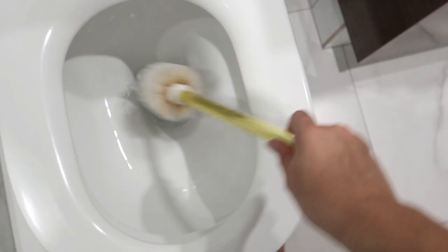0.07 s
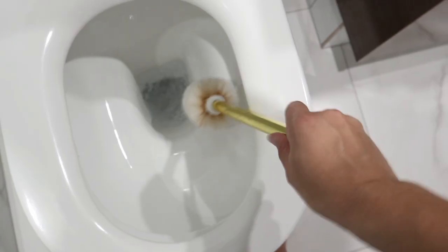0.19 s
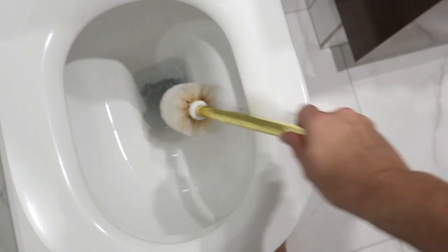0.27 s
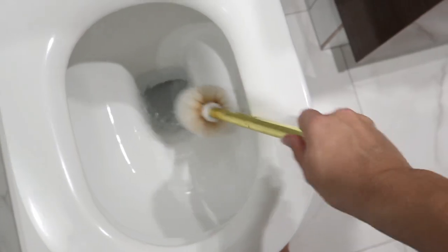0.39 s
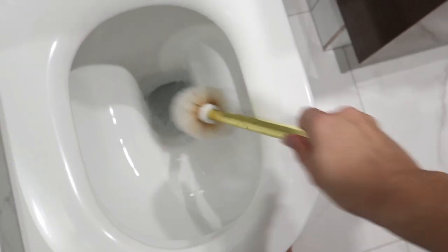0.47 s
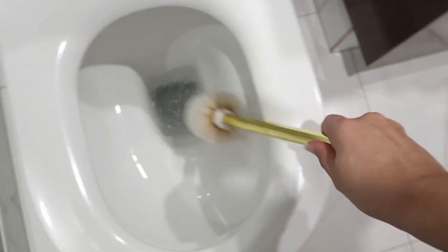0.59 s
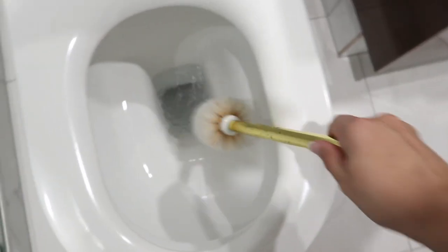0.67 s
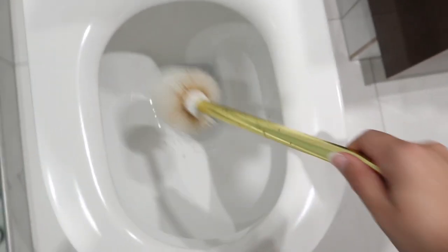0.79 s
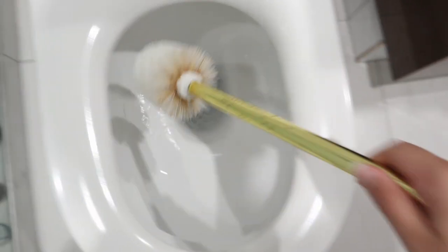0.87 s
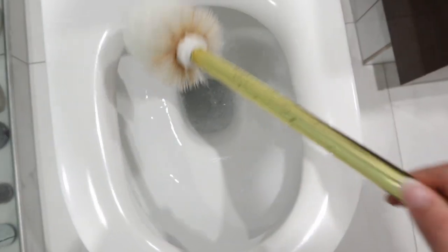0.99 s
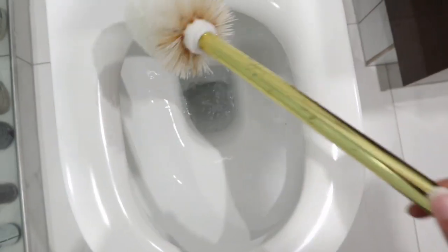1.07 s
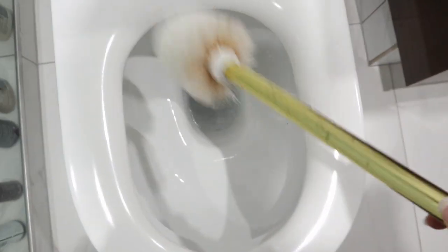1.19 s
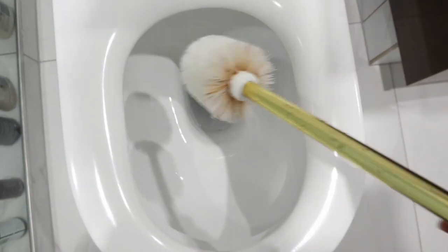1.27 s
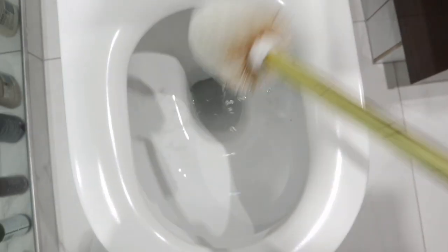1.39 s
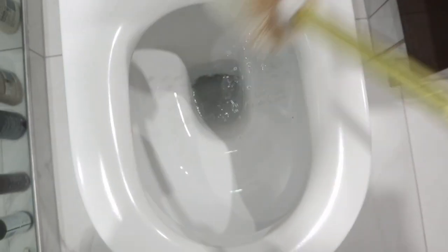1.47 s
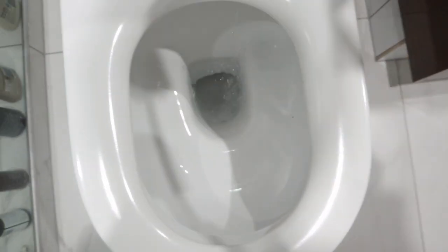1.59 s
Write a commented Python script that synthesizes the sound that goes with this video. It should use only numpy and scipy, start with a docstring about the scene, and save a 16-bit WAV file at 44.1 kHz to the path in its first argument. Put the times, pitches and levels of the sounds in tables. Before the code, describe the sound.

A plastic toilet brush knocks the porcelain bowl three times, each softer, with short wet trickles and ticking drops afterwards. Small echoing tiled bathroom, close handheld microphone, low mains hum and airy ventilation behind.

```python
"""In a tiled bathroom, a plastic brush is knocked three times on the porcelain of a toilet bowl; drops fall from it.
Each knock is a set of dying tones with a crack of noise; drops and trickles are short bursts of filtered noise.
Behind them lie mains hum, made of sine waves, and the rush of ventilation, made of patchy noise.
The recorder's gain control turns everything down after loud sounds, then slowly up again."""
import sys
import numpy as np
from scipy import signal
from scipy.fft import rfft, irfft
from scipy.io import wavfile
from scipy.ndimage import uniform_filter1d

SR = 44100
rng = np.random.default_rng(int(sys.argv[2]) if len(sys.argv) > 2 else 0)


def elevation(decibels):
    """Turn decibel levels (scalar or array-like) into linear amplitude ratios."""
    levels = np.asarray(decibels, float)
    return 10 ** (levels / 20)


def master(y):
    """Save y as 16-bit WAV."""
    cut = np.clip(np.atleast_2d(y).T, -1, 1)
    pcm = np.round(cut * 32767)  # scale
    wavfile.write(sys.argv[1], SR, pcm.astype(np.int16))


N = 72765  # length of the scene in samples
LAG_S = -0.000085  # negative: the right side hears noise and trickles this much later


def read(points, hz):
    """Reads a spectrum between its points, along a logarithmic frequency axis."""
    f, value = np.transpose(points)
    return np.interp(np.log(hz + 1), np.log(f + 1), value)


def curve(points, t):
    """Reads a curve in time between its points."""
    return np.interp(t, *np.transpose(points))


def evened(x):
    """Scales a sound to an rms of 1."""
    return x / np.sqrt(np.mean(x ** 2) + 1e-20)


def add(mix, start_s, sound):
    """Adds a sound to the mix from start_s on, cut off at the end of the mix."""
    part = mix[:, round(start_s * SR):][:, :sound.shape[-1]]
    part += sound[..., :part.shape[1]]


def ports(x, lag_s):
    """Makes a left-right pair: a negative lag lets the sound reach the right side later."""
    hz = np.fft.rfftfreq(len(x), 1 / SR)
    right = irfft(rfft(x) * np.exp(2j * np.pi * hz * lag_s), len(x))
    return np.array([x, right])


def spread(a, b, hz):
    """Blends two spectra into a left-right pair: the more they share, the narrower it sounds."""
    # how alike left and right are, before the later steps: f/Hz, likeness (0 to 1)
    likeness = [(25, 0.93), (60, 1), (400, 1), (1000, 0.95), (2500, 0.78), (6000, 0.68), (15000, 0.34)]
    # balance: f/Hz, left minus right level/dB
    balance = [(30, -7.5), (180, -2.5), (550, -1.5), (1650, -1.5), (4970, -1), (15000, -0.5)]
    # level of what both sides share, so treble comes mostly from the sides: f/Hz, level/dB
    centre = [(6000, 0), (6500, -1), (6900, -27), (9500, -27), (12500, -13), (15000, -18)]
    same = np.clip(read(likeness, hz), 0, 1)[:, None]
    side = elevation(read(balance, hz) / 2)[:, None]
    left = a * side * np.exp(-2j * np.pi * hz * LAG_S)[:, None]
    right = (same * a + np.sqrt(1 - same ** 2) * b) / side
    mid = (left + right) / 2 * elevation(read(centre, hz))[:, None]
    off = (left - right) / 2
    return np.array([mid + off, mid - off])


def hum():
    """Mains hum: sine waves at twice the mains frequency and its multiples, wavering together."""
    # the lines of the hum: f/Hz, rms level before the wavering/dB
    lines = [(100, -37), (200, -55), (300, -49)]
    # how the hum wavers: t/s, level change/dB
    waver = [(0, 5), (.12, 5.5), (.33, 2), (.4, -1), (.6, 2), (.8, 0), (.97, -6.5), (1.2, -2.5),
             (1.58, 3.5), (1.65, 3.5)]
    t = np.arange(N) / SR
    total = np.zeros(N)
    for hz, db in lines:
        total += np.sqrt(2) * elevation(db) * np.sin(2 * np.pi * (hz * t + rng.random()))
    return elevation(curve(waver, t)) * total


def ventilation():
    """Rushing air: random noise, patchy in time and pitch, strengthened where the ducts resonate."""
    # tone colour of the rush without the ducts: f/Hz, relative level per Hz/dB
    air_spectrum = [(15, -61), (25, -20.5), (97, -5.5), (149, -13.5), (301, -11), (560, -15.5),
                    (775, -17.5), (1130, -23), (1400, -22), (2220, -26), (5730, -30.5), (12500, -41.5),
                    (16000, -65)]
    # duct resonances: f/Hz, width/Hz, boost/dB
    ducts = [(217.7, 12, 9), (378.4, 13, 8.5), (486.6, 28.8, 13), (786.3, 30.3, 16.5), (860, 17, 10),
             (995, 112, 11), (1400, 120, 8.5), (1922, 35, 10)]
    # how the rush changes: t/s, level change/dB
    rush = [(0, 3), (.1, 3), (.3, 5.5), (.6, -4), (.85, -3.5), (.98, -6), (1.2, -5.5), (1.45, -3),
            (1.65, -1)]
    air_db, patchy_db = -33, 1.4  # rms level before the changes; rms depth of the patches
    frames, hz = N // 512 + 5, np.fft.rfftfreq(2048, 1 / SR)
    a, b, c, d, patches = rng.standard_normal((frames, 1025, 5)).T
    patches = uniform_filter1d(patches, size=16, axis=0)  # smooth across pitch
    patches = evened(uniform_filter1d(patches, size=5, axis=1))  # smooth in time
    db = read(air_spectrum, hz)
    for f, width_hz, boost_db in ducts:
        db = db + boost_db / (1 + (2 * (hz - f) / width_hz) ** 2)
    z = spread(a + 1j * b, c + 1j * d, hz) * elevation(db[:, None] + patchy_db * patches)
    noise = signal.istft(z, nperseg=2048, noverlap=1536)[1][:, :N]
    return elevation(air_db + curve(rush, np.arange(N) / SR)) * evened(noise)


def bathroom(x):
    """Reverberation: dense echoes of random sign, each pitch band dying at its own speed."""
    # how long the room rings: f/Hz, time to fall by 60 dB/s
    room_t60 = [(150, 0.96), (400, 0.57), (1000, 0.54), (2500, 0.55), (5000, 0.5), (9000, 0.15),
                (16000, 0.044)]
    taps = np.zeros((2, SR))
    # one echo at a random place in every 20 samples
    at = np.arange(200, SR - 20, 20) + rng.integers(0, 20, (2, (SR - 201) // 20))
    np.put_along_axis(taps, at, rng.choice([-1., 1.], at.shape), 1)
    hz, t, z = signal.stft(taps, SR, nperseg=512)
    fading = elevation(-60 * t / read(room_t60, hz)[:, None])
    tail = signal.istft(spread(*z, hz) * fading, SR, nperseg=512)[1]
    return signal.fftconvolve(x[None], tail / np.linalg.norm(tail[0]), axes=1)[:, :N]


def trickle(length_s, db, hz, width_hz):
    """Water running off the bristles: uneven fine noise in one band that fades a little and stops short."""
    fade_db, edge_s = -9, 0.0013  # fade over the whole length; time to start and to stop
    n = round(length_s * SR)
    t, f = np.arange(n) / SR, np.fft.rfftfreq(n, 1 / SR)
    bursts = elevation(2.3 * rng.exponential(1, (2, 8192))[:, :n])  # some grains stick out
    spatter = rng.standard_normal((2, 8192))[:, :n] * bursts
    a, b = irfft(rfft(spatter) / (1 + (2 * (f - hz) / width_hz) ** 6), n)
    pair = evened(ports(a, LAG_S) + 0.4 * np.array([b, -b]))  # b widens the pair
    edges = np.clip(np.minimum(t, length_s - t) / edge_s, 0, 1)
    return elevation(db + fade_db * t / length_s) * pair * edges


def water_drop(db, low_hz, high_hz, t60):
    """A falling drop: a tick made of a sudden push and noise, dying together, in a steep band."""
    lag_s = -0.0000688  # the right side hears it later
    t = np.arange(2048) / SR
    splash = (1 + rng.standard_normal(len(t))) * elevation(-60 * t / t60)
    band = signal.butter(7, [low_hz, high_hz], "bandpass", fs=SR, output="sos")
    tick = signal.sosfilt(band, splash)
    return ports(elevation(db) * tick / abs(tick).max(), lag_s)


def knock(db, bright_db, thud_db, air_db, contact_s):
    """Brush on porcelain: paired tones (modes) swell and die under a crack of noise. Row 3 feeds the room."""
    # pitches of the modes of the bowl and its air: f/Hz
    mode_hz = [147, 219, 310, 425, 465, 610, 746, 1196, 1378, 1472, 1578, 1706, 1952, 2204, 2290, 2412,
               2735, 3000, 3200, 3420, 3865, 4253, 4650, 5000, 5460, 6050, 6600]
    # the same modes in order: level before each knock's changes/dB, time to fall by 60 dB/s
    modes = [(-18, 0.21), (-12.5, 0.25), (-14, 0.044), (-4.5, 0.032), (-23.5, 0.22), (-12, 0.049),
             (-10, 0.036), (-19, 0.055), (-9, 0.05), (-0.5, 0.026), (-1, 0.029), (-4.5, 0.032), (-18, 0.13),
             (-10, 0.019), (-5, 0.025), (-9, 0.032), (-11, 0.036), (-19, .04), (-23, 0.036), (-18, 0.034),
             (-3.5, 0.02), (-16, 0.035), (-25.5, 0.017), (-16.5, 0.02), (-16, 0.03), (-16, 0.019),
             (-24, 0.03)]
    # tone colour of the crack before each knock's brightness: f/Hz, relative level per Hz/dB
    crack_spectrum = [(150, -34), (400, -12), (900, 0.5), (1500, -2.5), (2400, -2), (3200, -8.5),
                      (3900, 0.5), (4600, -12.5), (5500, -7), (6500, -9), (8000, -11), (12000, -26.5),
                      (17000, -76)]
    crack_db, crack_t60, crack_near_db = -8, 0.036, -3.5  # the crack is weaker straight than in the room
    lag_s = -0.000057  # the right side hears it later
    twin_db, twin_apart = -5, 0.042  # twin of each mode: highest level, typical share of pitch away
    scatter = 1  # random phase of a blow, radians
    swell_s = 0.044  # air in the bowl, under 250 Hz: it swells this long, fades and returns faintly
    bloom_cycles, treble_s = 2.18, 0.0026  # other modes swell this many cycles; over 3 kHz this much longer
    air_to_room_db, bass_to_room_db, ring_to_room_db = -5, -2, -8.5  # under 250 Hz, under 1 kHz, above
    wall_s, wall_db = 0.0095, -22  # first echo off the tiles

    t = np.arange(16384) / SR
    out = np.zeros((3, len(t)))
    for hz, (mode_db, t60), u in zip(mode_hz, modes, rng.standard_normal((len(modes), 4))):
        in_air = hz < 250
        # phase at left and right, pushed apart at random
        apart = 0.5 * u[1] * np.array([[1], [-1]]) * min(hz / 1500, 1)
        turn = 2 * np.pi * hz * (t - contact_s + np.array([[0], [lag_s]])) + apart
        twin = elevation(twin_db) * min(hz / 3000, 1) * np.sin(turn * (1 + twin_apart * u[2]) + np.pi * u[3])
        if in_air:
            level_db = mode_db + air_db
            progress = t / swell_s
            to_room_db = air_to_room_db
        else:
            level_db = mode_db + thud_db * (hz < 500) + bright_db * np.log2(hz / 1500)
            bloom_s = contact_s + bloom_cycles / hz + treble_s * (hz > 3000)
            progress = np.minimum(t / bloom_s, 1)
            to_room_db = bass_to_room_db if hz < 1000 else ring_to_room_db
        bloom = np.sin(np.pi / 2 * progress)
        mode = bloom * elevation(level_db - 60 * t / t60) * (np.cos(turn + scatter * u[0]) + twin)
        out += np.vstack([mode, elevation(to_room_db) * mode[1]])

    f = np.fft.rfftfreq(len(t), 1 / SR)
    colour = elevation(read(crack_spectrum, f) + bright_db * np.log2((f + 50) / 1500))
    a, b = irfft(rfft(rng.standard_normal((2, len(t)))) * colour)
    crack = evened(ports(a, lag_s) + 0.067 * np.array([b, -b]))  # b widens the pair
    crack = crack * elevation(crack_db - 60 * t / crack_t60) * np.minimum(t / contact_s, 1)
    out += np.vstack([elevation(crack_near_db) * crack, crack[1]])
    echo = np.roll(out, round(wall_s * SR), axis=1) * (t > wall_s)
    return elevation(db) * (out + elevation(wall_db) * echo)


def scene():
    """Hum and ventilation under trickles, drops and knocks, which also sound in the room."""
    # water running off the bristles: start t/s, length t/s, rms level at the start/dB, centre f/Hz, width/Hz
    trickles = [(0.93, 0.049, -53, 3100, 2200), (0.71, .007, -47, 4500, 3500),
                (.869, 0.076, -36.5, 3240, 1800), (.585, 0.055, -37.5, 2500, 5600)]
    # drops: t/s, peak level/dB, low edge f/Hz, high edge f/Hz, time for the splash to fall by 60 dB/s
    drops = [(0.8037, -15, 3550, 7200, 0.015), (.8046, -25, 2000, 4300, 0.0092),
             (0.8667, -14.5, 2400, 4260, .002)]
    # knocks: t/s, strength level/dB, brightness/dB per octave, extra thud at 250-500 Hz level/dB,
    # air in the bowl level/dB, contact time/s
    knocks = [(0.207, 6.5, 1.5, 6.5, -5, 0.001162), (0.384, 2.5, 1, 2, -2, 0.0022),
              (0.6241, -1, 1, 2, -1.5, 0.002)]
    room_db, water_room_db = -7.5, -21.5  # how strongly knocks and water feed the room
    blows, water = np.zeros((3, N)), np.zeros((2, N))
    for mix, table, source in ((water, trickles, trickle), (water, drops, water_drop), (blows, knocks, knock)):
        for start_s, *settings in table:
            add(mix, start_s, source(*settings))
    echoes = bathroom(elevation(room_db) * blows[2] + elevation(water_room_db) * water[1])
    return hum() + ventilation() + echoes + water + blows[:2]


def band_limit(x):
    """A steep low-pass at the top of the band."""
    return signal.sosfilt(signal.butter(12, 18130, fs=SR, output="sos"), x)


def record(dry):
    """The recorder's gain control falls after loud sounds and climbs back slowly; peaks are rounded off."""
    threshold_db, slope = -32, 0.47  # cut in dB for each dB above the threshold
    sense_s, fall_s, rise_db_per_s = 0.063, 0.029, 22  # smoothing of loudness and of the cut; climb back
    ceiling = 1.03
    r = np.exp(-1 / (sense_s * SR))
    power = signal.lfilter([1 - r], [1, -r], (dry ** 2).mean(0))
    power_db = 10 * np.log10(power + 1e-12)
    cut_db = slope * np.maximum(power_db - threshold_db, 0)
    # hold the deepest cut so far, relaxing at a steady rate
    climb = np.arange(N) * rise_db_per_s / SR
    cut_db = np.maximum.accumulate(cut_db + climb) - climb
    r = np.exp(-1 / (fall_s * SR))
    level = dry / elevation(signal.lfilter([1 - r], [1, -r], cut_db))
    rounded = level / (1 + abs(level / ceiling) ** 4) ** 0.25
    return band_limit(rounded)


dry = scene()
out = record(dry)
master(out)
```